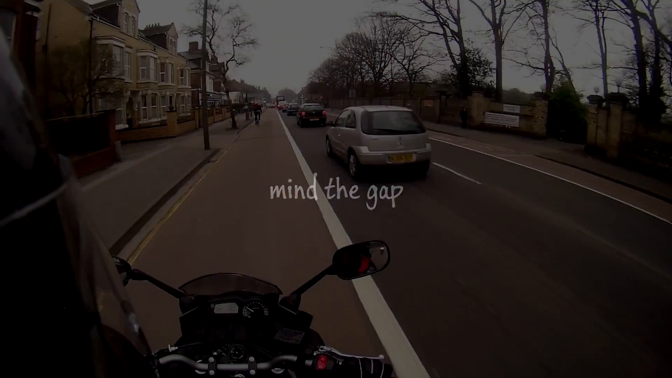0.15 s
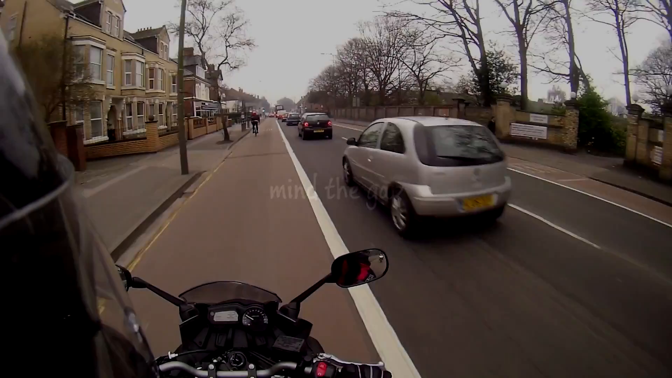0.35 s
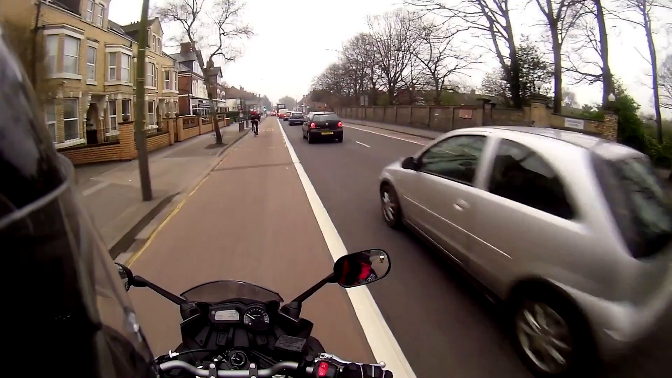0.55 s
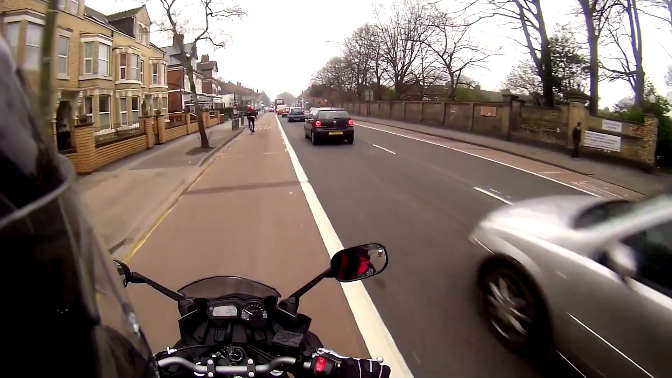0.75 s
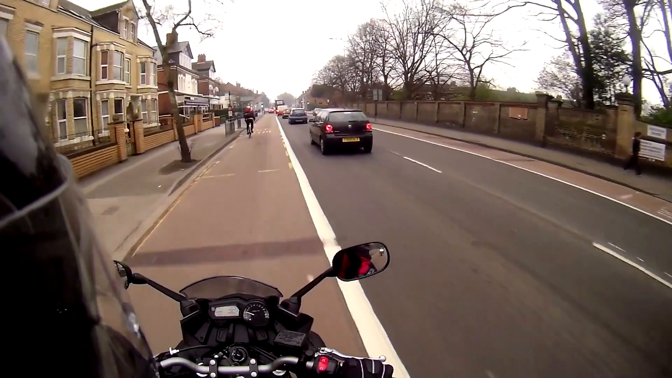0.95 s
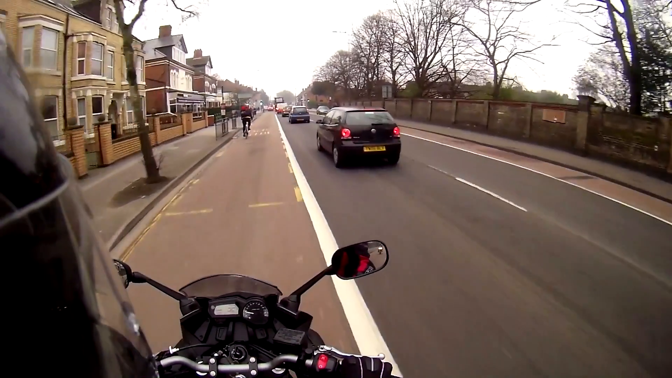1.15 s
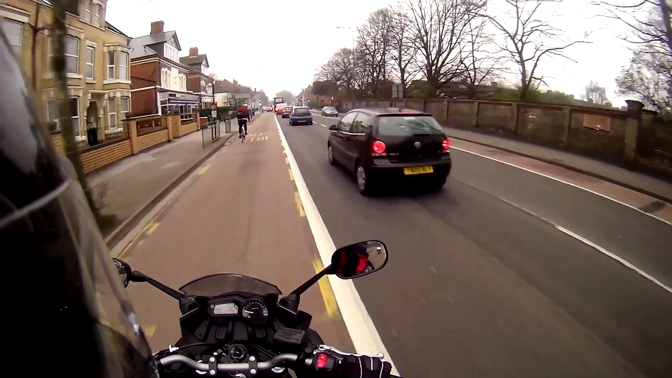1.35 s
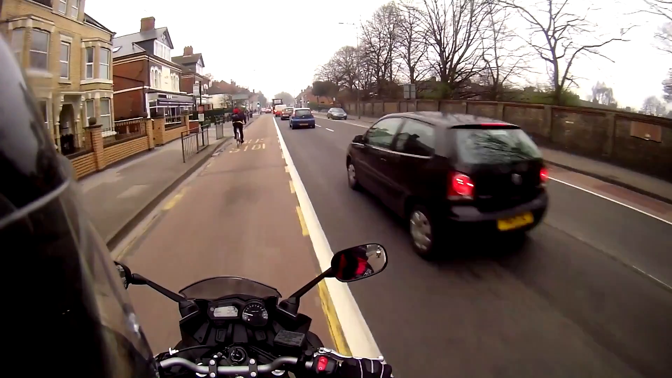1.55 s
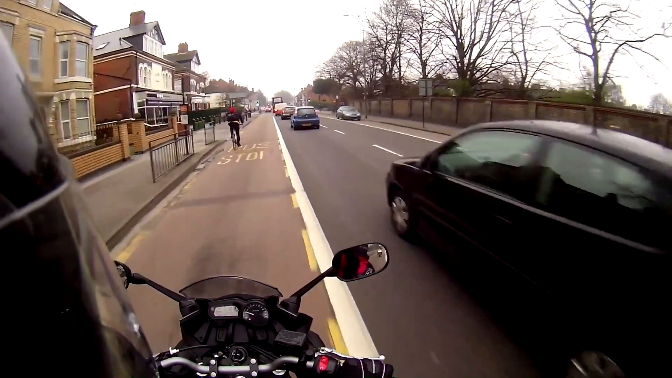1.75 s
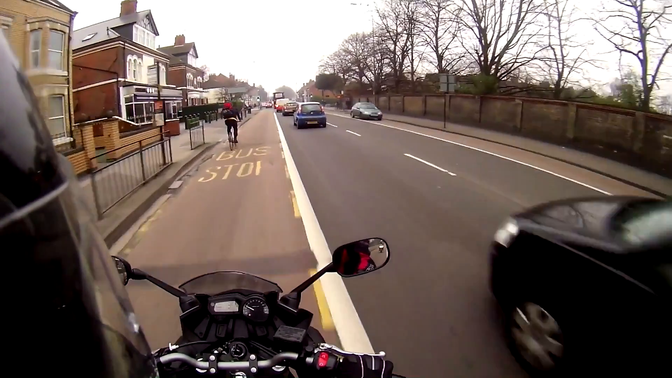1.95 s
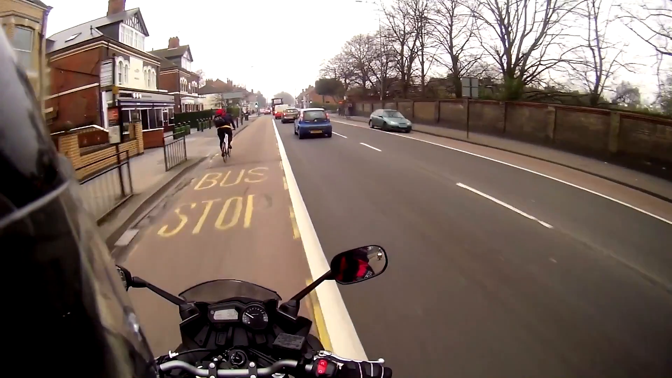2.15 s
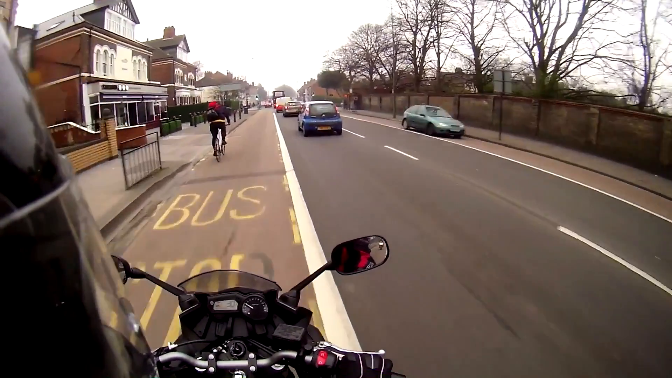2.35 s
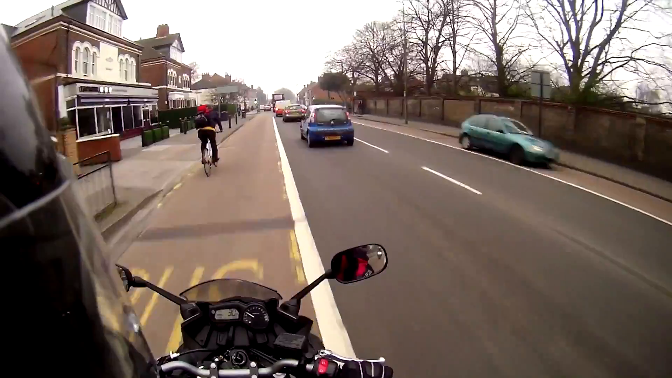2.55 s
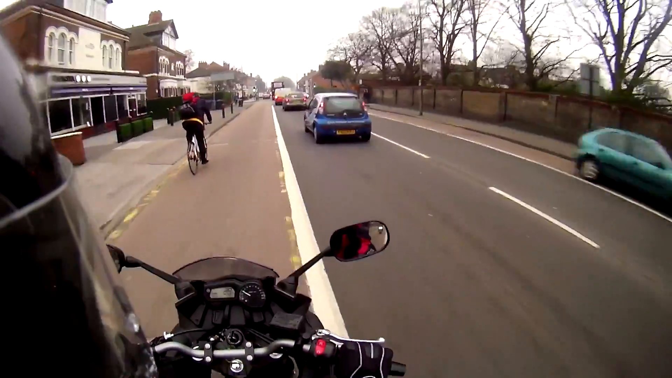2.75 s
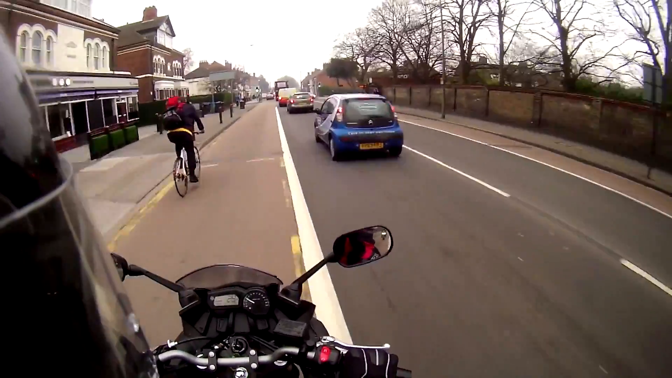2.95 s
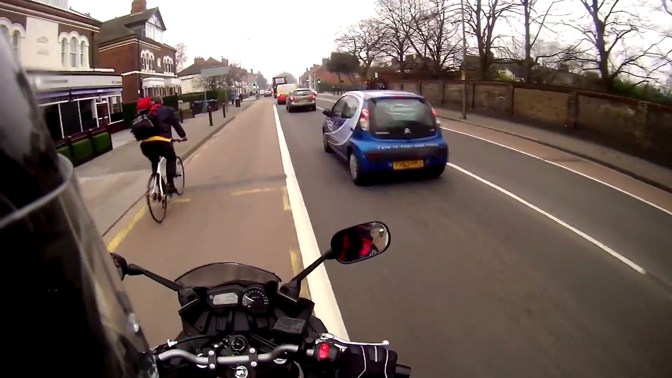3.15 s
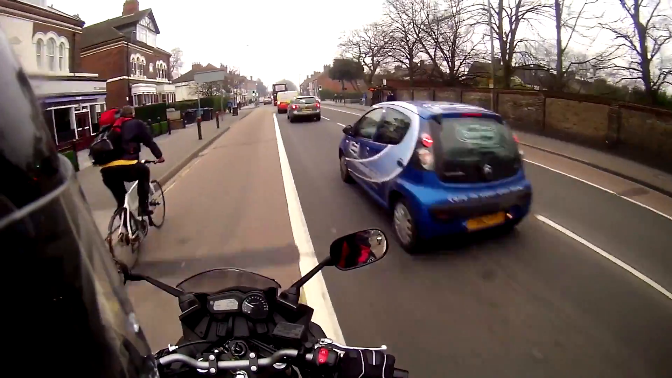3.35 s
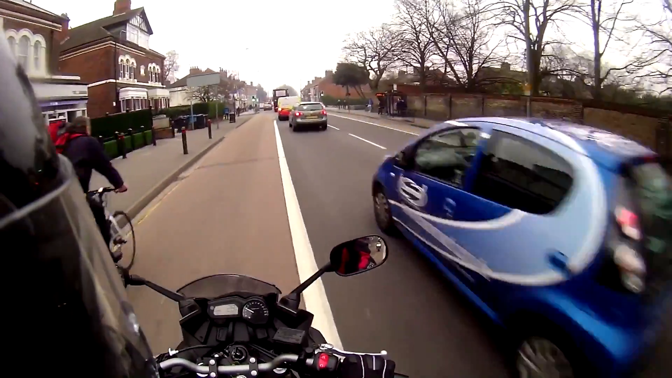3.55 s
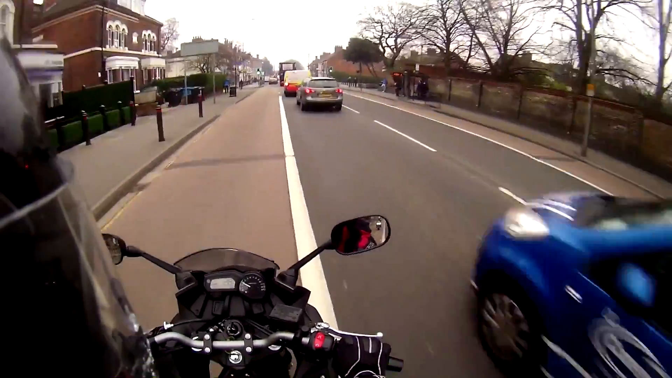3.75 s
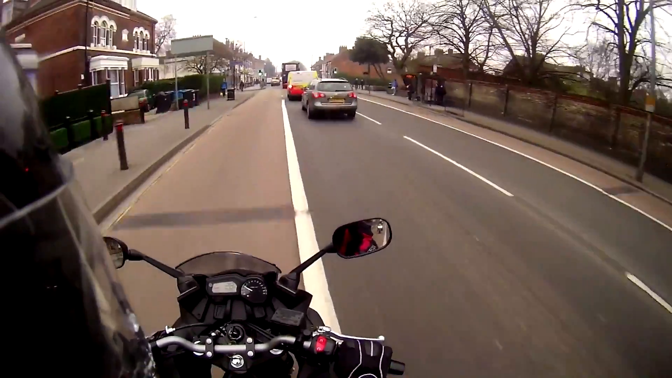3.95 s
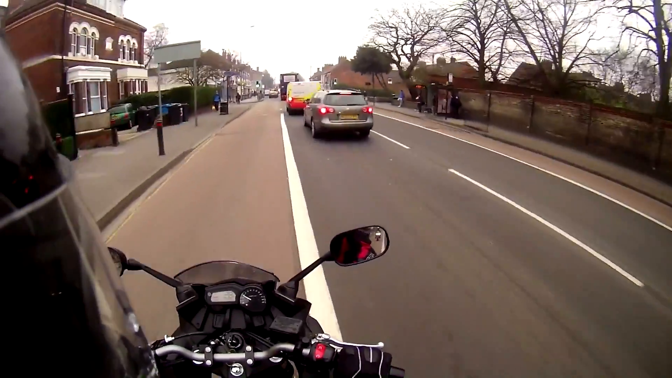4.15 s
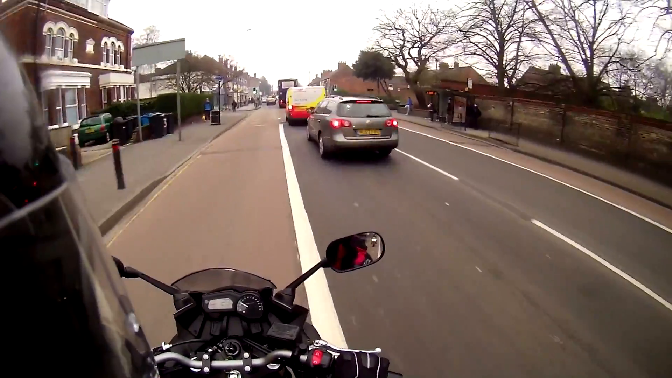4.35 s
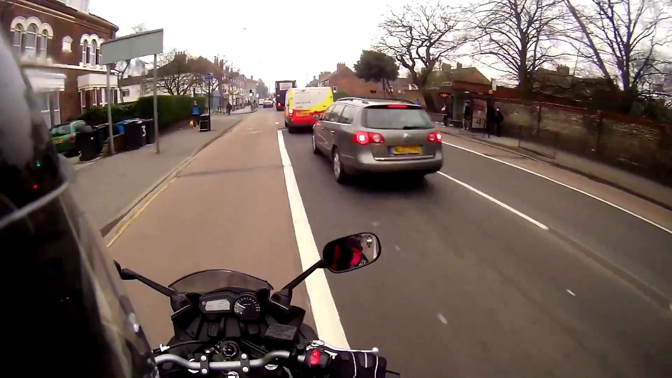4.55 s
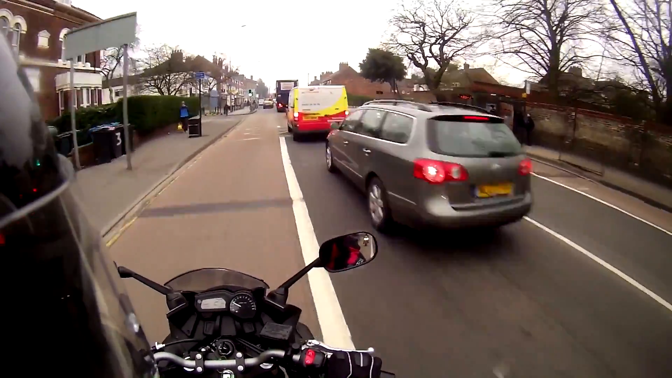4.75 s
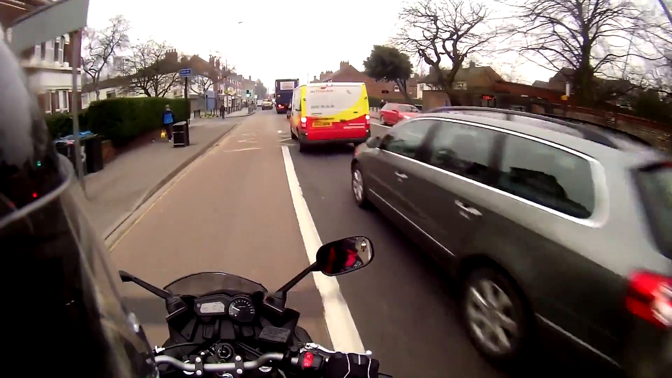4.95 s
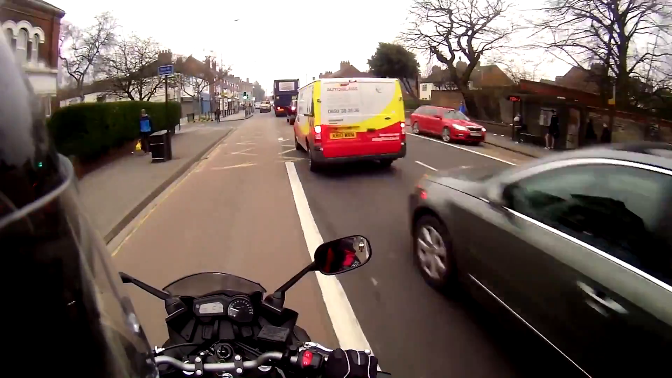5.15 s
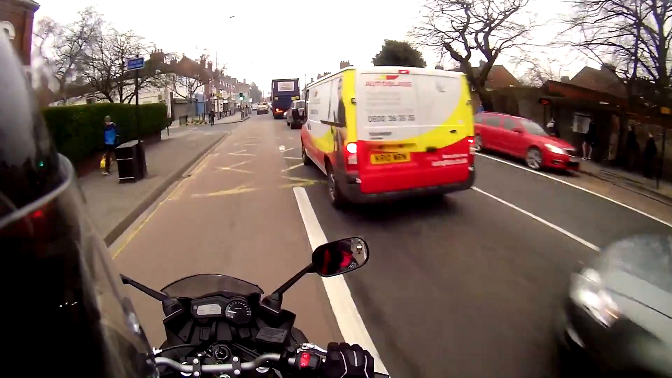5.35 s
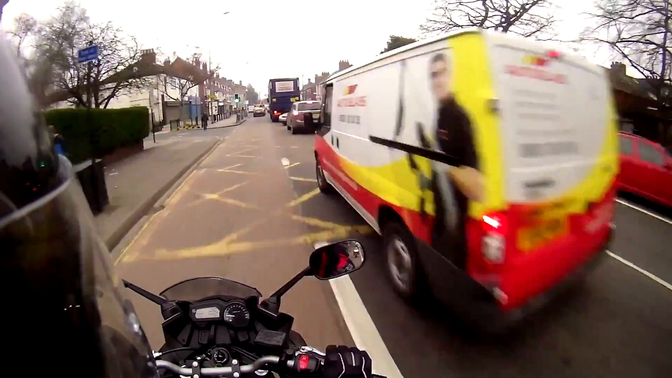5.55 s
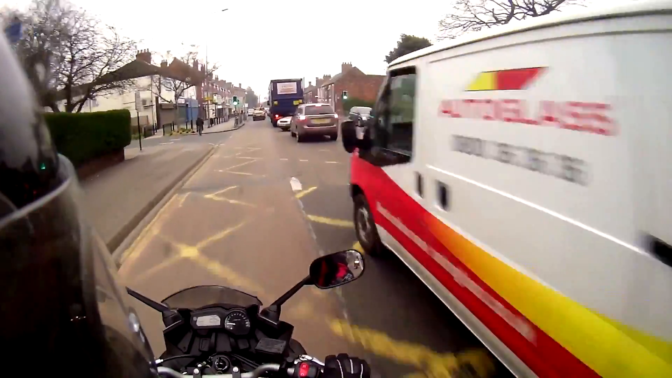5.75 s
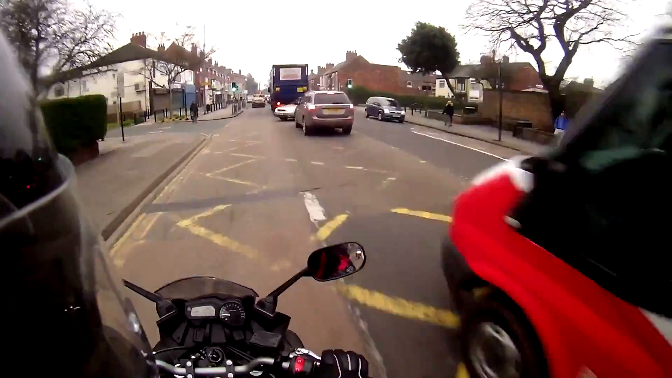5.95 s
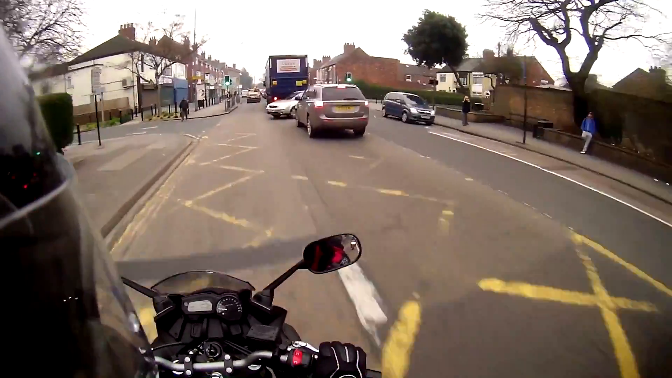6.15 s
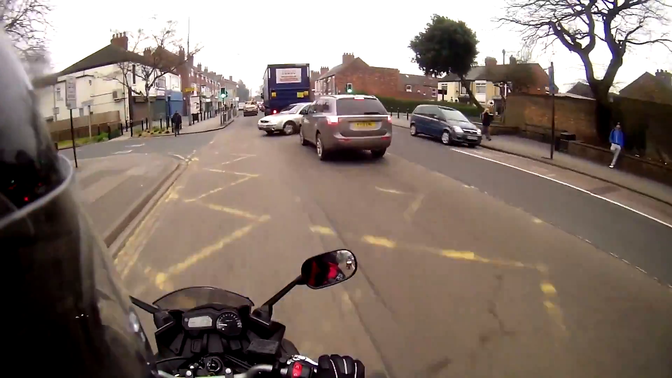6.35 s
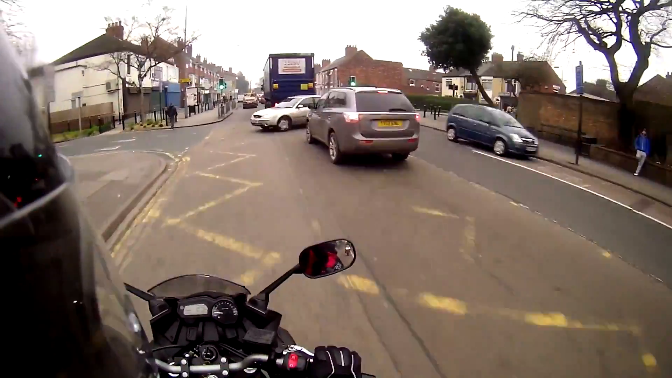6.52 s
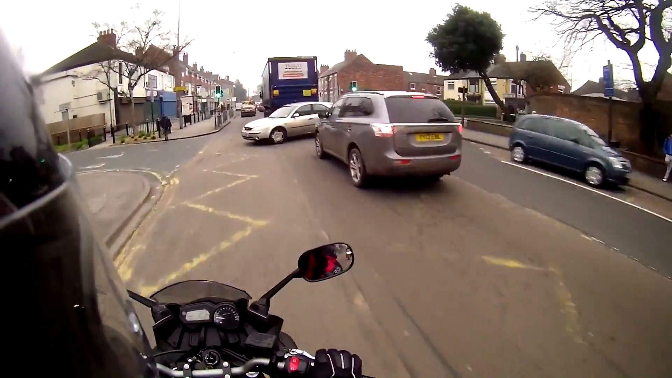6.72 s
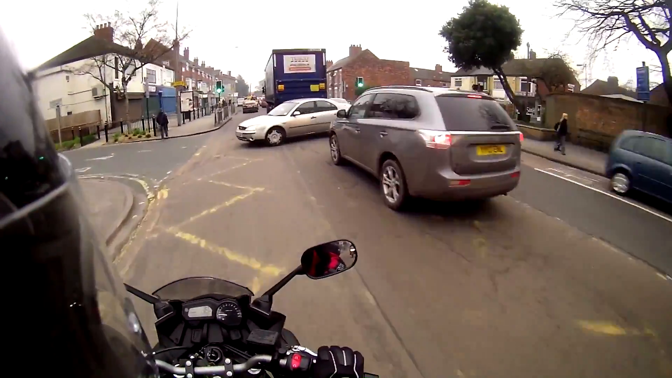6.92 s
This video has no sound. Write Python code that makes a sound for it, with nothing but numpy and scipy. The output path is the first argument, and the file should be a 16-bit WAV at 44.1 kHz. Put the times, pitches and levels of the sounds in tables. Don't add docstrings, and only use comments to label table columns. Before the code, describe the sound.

Helmet microphone on a moving motorcycle in a city street. Heavy low wind buffets and flutters over a steady engine drone and tyre hiss. A short gritty scuff and tiny squeak come early, then a faint car whine. The engine slowly sinks in pitch, growing a howl, until the clutch cuts in with a quick downward slide. Hiss swells beside a van, then the wind eases.

```python
import sys
import numpy as np
from scipy import signal
from scipy.io import wavfile
from scipy.ndimage import uniform_filter1d

SR = 44100
rng = np.random.default_rng(int(sys.argv[2]) if len(sys.argv) > 2 else 0)


def master_out(mix):
    frames = np.transpose(np.atleast_2d(mix))
    ceiling = np.clip(frames, -1, 1)
    pcm = np.round(ceiling * 32767).astype(np.int16)
    wavfile.write(sys.argv[1], SR, pcm)


def volts_from_db(level):
    exponent = np.asarray(level, float) / 20
    return 10 ** exponent


N = 312228
T = np.arange(N) / SR

# (time [s], turns per second [Hz])
CRANK_SPEED = [(0, 46.5), (.5, 46.2), (1, 48.5), (1.9, 48.2), (2.8, 46), (3.75, 44.3), (3.98, 43.4),
               (4.1, 43.9), (4.45, 43.2), (4.6, 43), (4.85, 42.9), (4.91, 42), (4.96, 45), (5.5, 41.5),
               (5.75, 45.3), (6.05, 45.9), (7.08, 44.9)]
LEAD_ORDERS = (2, 3, 10, 12)
# (multiple of crank speed [1], level against the lead [dB])
MINOR_ORDERS = [
    [(4, -10), (6, -15)],
    [(5, -14), (6, -13), (1, -9), (4, -15)],
    [(8, -11), (11, -4)],
    [(14, -17)],
]
# (time [s], level [dB])
INTAKE_HOWL = [(0, -60), (2.0, -57), (2.9, -54), (3.2, -50), (3.9, -48), (3.97, -40), (4.5, -39),
               (7.08, -39)]
# (time [s], level [dB], length [s])
THROTTLE_BLIP = [
    (.2, 11, .8),
]
# (frequency [Hz], width [Hz], level [dB])
AIRBOX = (510, 41.5, -45)
# (time [s], level [dB])
ENGINE_SHAKE = [(0, -9), (.6, -3.5), (1.4, -4.5), (1.8, 3.5), (2.3, -1), (2.6, -0.5), (2.9, 2.5), (3.3, -2),
                (4.0, 2.5), (4.85, -2), (4.95, -6.5), (6, -19), (7.08, -7)]
# (time [s], frequency [Hz], level [dB])
CLUTCH_DIVE = [(4.87, 495, -48), (4.99, 396, -45), (5.07, 360, -52), (5.15, 330, -47), (5.3, 275, -52)]

# (time [s], roar level [dB])
AIRSTREAM = [(0.0, -40), (0.2, -36.5), (0.61, -32.5), (1.03, -32.5), (1.62, -37), (2.42, -34), (3.96, -36),
             (4.32, -38.5), (4.77, -36), (4.99, -37.5), (6.33, -39.5), (6.62, -42.5), (7.08, -45.5)]
# (time [s], level [dB], length [s])
GUSTS = [(0.07, 7.5, 0.074), (0.3, 6.5, 0.047), (0.51, -4, 0.2), (1.02, -8, 0.06), (1.1, -4.5, 0.053),
         (1.24, -4, 0.053), (1.47, -4.5, 0.055), (1.68, 8.5, 0.23), (1.93, -7, 0.076), (2.11, -3.5, 0.054),
         (2.3, 6, 0.097), (2.42, -2, 0.053), (2.79, 7.5, 0.065), (2.86, -3.0, 0.052), (3.18, -9, 0.13),
         (3.62, 7, 0.053), (4.14, 5, 0.1), (4.26, 3.5, 0.91), (4.46, -4, 0.072), (4.55, 10.5, 0.06),
         (4.89, -7, 0.14), (5.04, 7, 0.068), (5.33, 5, 0.3), (5.57, 2.9, 0.06), (5.7, -3.5, 0.15),
         (5.96, -3, 0.45), (6.0, -5.7, 0.06), (6.54, -3, 0.09), (6.71, -5, 0.046), (6.95, -2, 0.13)]
# (time [s], level [dB], length [s])
FLAPS = [(0.02, 0.7, 0.8), (0.34, 3.5, 0.056), (0.96, -0.5, 0.26), (1.25, 0.5, 0.065), (1.35, 3.5, 0.09),
         (1.55, 3.5, 0.054), (1.79, 3, 0.3), (2.1, -2.5, 0.15), (2.39, 2.5, 0.059), (2.51, -2.5, 0.06),
         (2.57, 3, 0.06), (2.66, -3.5, 0.11), (2.98, -7, 0.09), (3.09, 3, 0.12), (3.85, 4.5, 0.1),
         (4.33, 2, 0.049), (4.41, -3.5, 0.075), (4.66, 4.7, 0.081), (4.8, 5, 0.078), (4.94, 5.0, 0.07),
         (5.13, -0.5, 0.08), (5.25, 5.5, 0.042), (5.34, -7, 0.054), (5.55, -1, 0.34), (5.94, 2.3, 0.09),
         (6.35, -1, 0.66), (6.37, -11, 0.06), (6.79, -11, 0.1), (6.97, 4, 0.19), (6.99, -7, 0.075)]
# (frequency [Hz], level [dB per Hz])
BUFFET_SPECTRUM = [(4.7, -32.5), (8.0, 0), (27, 10.5), (60, -9), (78, -24.5), (130, -120)]
# (frequency [Hz], level [dB per Hz])
FLUTTER_SPECTRUM = [(29, -44.5), (50, 1.5), (94, -9), (220, -23.5), (290, -43.5), (480, -120)]
# (frequency [Hz], level [dB per Hz])
ROAR_SPECTRUM = [(59, -9), (100, 1), (145, -6), (184, -10.5), (270, -9), (324, -11.5), (382, -9),
                 (500, -14), (800, -35), (1040, -63), (1760, -120)]

# (time [s], level [dB])
ROAD_NEARNESS = [(0, -6.5), (.12, -2), (.4, 1), (1.0, -2), (1.5, 0), (2.5, 2), (3.3, .5), (4.2, -.5),
                 (4.9, -0.5), (5.2, -2), (6.2, -4), (6.7, -5), (7.08, -6)]
# (time [s], level [dB], length [s])
PASSES = [(.68, 3, 0.45), (1.0, 2, 0.21), (1.9, 2, 0.4), (3.75, 1.7, 0.12), (4.9, 0, 0.15), (5.97, 0, 0.23)]
# (start [s], end [s], level [dB])
VAN_SIDE = (5.6, 6.14, 3.5)
# (frequency [Hz], level [dB per Hz])
TYRE_SPECTRUM = [(330, -33.5), (560, 0.5), (832, -10), (1150, -7), (1500, -18), (1950, -53.5), (3300, -120)]
# (frequency [Hz], level [dB per Hz])
TREAD_SPECTRUM = [(850, -24), (1450, -2.5), (1720, -2.5), (2010, -3.5), (2160, -4), (2320, -4.5),
                  (2910, -12.5), (3500, -16.5), (4550, -31.5), (7700, -120)]
# (frequency [Hz], width [Hz], level against tread noise [dB])
FAIRING_PANELS = [
    (2021, 83, -10),
    (2343, 170, -11.5),
    (5510, 65, -31),
]
# (frequency [Hz], level [dB per Hz])
HISS_SPECTRUM = [(1650, -12.5), (2800, -3.5), (4520, -8.5), (5620, -9), (6480, -13.5), (7920, -11),
                 (10300, -17), (11500, -25.5), (15000, -59.5), (22000, -120)]

# (time [s], level [dB], length [s], colour [Hz], width [Hz])
SCUFFS = [(.562, -67, .005, 8050, 250), (.576, -65, .007, 8050, 250), (.648, -48, .016, 2000, 1500),
          (.652, -56, .012, 5200, 1400), (.653, -54, .016, 3300, 5000), (.657, -65, .02, 8500, 2000),
          (.66, -61, .06, 3500, 4000), (.915, -62, .018, 4500, 4000), (1.884, -66, .006, 5900, 600),
          (5.063, -67, .005, 5850, 400), (5.657, -70, .035, 7000, 4000)]
# (time [s], frequency [Hz], level [dB])
BRAKE_SQUEAK = [(.916, 6230, -72), (.926, 6230, -76), (.933, 6240, -65), (.94, 6240, -71),
                (.947, 6230, -66), (.96, 6140, -70), (.99, 6200, -73), (1.01, 6180, -77)]
# (time [s], frequency [Hz], level [dB])
CAR_WHINE = [(1.0, 627, -53), (1.3, 616, -48), (1.7, 600, -47), (2.1, 587, -48), (2.5, 576, -52)]
# (time [s], frequency [Hz], level [dB])
TYRE_SONG = [(1.7, 682, -55), (2.0, 672, -52), (2.35, 660, -51), (2.65, 652, -55)]
# (time [s], frequency [Hz], level [dB])
FAR_BRAKE = [(5.74, 4110, -79), (5.85, 4220, -83), (5.97, 4220, -80), (6.01, 4180, -75), (6.05, 4150, -79)]
# (time [s], frequency [Hz], level [dB])
BUS_DRONE = [(6.2, 387, -57), (6.7, 384, -55), (6.9, 381, -51), (7.08, 378, -53)]


def evened(x):
    return x / np.sqrt(np.mean(x ** 2) + 1e-20)


def columns(rows, t):
    s, *rest = np.transpose(rows)
    return [np.interp(t, s, c) for c in rest]


def level_curve(rows):
    return columns(rows, T)[0]


def bumps(rows):
    t = T[::64]
    total_db = sum(db * np.exp(-(2 * (t - s) / length) ** 2) for s, db, length in rows)
    return np.interp(T, t, total_db)


def drift(rate_hz, length=N):
    knots = rng.standard_normal(int(length / SR * 60) + 9)
    smooth = signal.lfilter([1], [1, -np.exp(-2 * np.pi * rate_hz / 60)], knots)
    return evened(np.interp(np.arange(length) / SR * 60, np.arange(len(knots)), smooth))


def resonate(x, hz, width):
    turn = np.exp(2j * np.pi * hz * np.arange(len(x)) / SR)
    r = np.exp(-np.pi * width / SR)
    smooth = signal.lfilter([1], np.convolve([1, -r], [1, -r]), x / turn)
    return (turn * smooth).real


def noise(spectrum, size, patchy_db, flicker_db):
    frames, hz = 4 * N // size + 5, np.fft.rfftfreq(size, 1 / SR)
    a, b, patches = rng.standard_normal((frames, len(hz), 3)).T
    patches = uniform_filter1d(patches, size=size // 100, axis=0)
    patches = evened(uniform_filter1d(patches, size=16000 // size, axis=1))
    flicker = evened(uniform_filter1d(rng.standard_normal(frames), size=8000 // size + 1))
    f, db = np.transpose(spectrum)
    shape_db = np.interp(np.log(hz + 1), np.log(f + 1), db, left=-120, right=-120)[:, None]
    z = (a + 1j * b) * volts_from_db(shape_db + patchy_db * patches + flicker_db * flicker)
    return evened(signal.istft(z, nperseg=size, noverlap=3 * size // 4)[1][:N])


def steadied(x, span_s):
    size = int(span_s * SR)
    power = uniform_filter1d(uniform_filter1d(x ** 2, size), size)
    return evened(x / np.sqrt(power + 0.071))


def order_levels():
    clutch_s, clutch_length_s = 4.89, .06
    free = np.clip((T - clutch_s) / clutch_length_s + .5, 0, 1)
    howl_db = level_curve(INTAKE_HOWL)
    low_howl_db = np.minimum(howl_db + 2 + bumps(THROTTLE_BLIP), -46)
    pulling_db = [-35.5, -56, low_howl_db, howl_db]
    coasting_db = [-44, -40, -63, -63]
    return [a + (b - a) * free for a, b in zip(pulling_db, coasting_db)]


def engine():
    turns = np.cumsum(level_curve(CRANK_SPEED) * (1 + .005 * drift(6.0))) / SR
    out = np.zeros(N)
    for lead, level_db, minor in zip(LEAD_ORDERS, order_levels(), MINOR_ORDERS):
        for order, db in [(lead, 0)] + list(minor):
            wavering = volts_from_db(level_db + db + 1.8 * drift(8.0))
            out += wavering * np.sqrt(2) * np.sin(2 * np.pi * (order * turns + rng.random()))
    hz, width, db = AIRBOX
    breath = evened(resonate(rng.standard_normal(N), hz, width))
    out += volts_from_db(db + level_curve(ENGINE_SHAKE)) * breath
    beat = np.cos(np.pi * turns) + 0.74 * np.cos(2 * np.pi * turns)
    return out, beat


def wind_on_microphone():
    air_db = level_curve(AIRSTREAM) + 35.7
    lumps_db = 2.6 * drift(10.0)
    buffet_db = -25.03 + 1.43 * air_db + 1.1 * bumps(GUSTS) + lumps_db
    flutter_db = -29.0 + 1.21 * air_db + 1.43 * bumps(FLAPS)
    buffet = steadied(noise(BUFFET_SPECTRUM, size=8192, patchy_db=-1.6, flicker_db=-0.5), 0.1)
    flutter = steadied(noise(FLUTTER_SPECTRUM, size=8192, patchy_db=1.4, flicker_db=0), 0.065)
    return volts_from_db(buffet_db) * buffet + volts_from_db(flutter_db) * flutter


def helmet_roar(beat):
    roar = steadied(noise(ROAR_SPECTRUM, size=4096, patchy_db=0.97, flicker_db=0), 0.077)
    return volts_from_db(level_curve(AIRSTREAM) + 1.5 + 0.19 * beat) * roar


def tyre_rumble(beat):
    air_db = level_curve(AIRSTREAM) + 35.7
    level_db = -45.5 + 0.52 * level_curve(ROAD_NEARNESS) + 0.4 * air_db + 1.07 * bumps(PASSES)
    rumble = steadied(noise(TYRE_SPECTRUM, size=1024, patchy_db=0.5, flicker_db=0.5), .2)
    return volts_from_db(level_db + .5 * beat) * rumble


def tread_and_fairing(beat):
    level_db = -54.76 + 1.18 * level_curve(ROAD_NEARNESS) + .6 * bumps(PASSES)
    panels = np.zeros(N)
    for hz, width, db in FAIRING_PANELS:
        panels += volts_from_db(db) * evened(resonate(rng.standard_normal(N), hz, width))
    tread = noise(TREAD_SPECTRUM, size=1024, patchy_db=0.94, flicker_db=0.52)
    return volts_from_db(level_db + 0.24 * beat) * (tread + volts_from_db(level_curve(ENGINE_SHAKE)) * panels)


def road_hiss(beat):
    start, end, van_db = VAN_SIDE
    returned_db = np.interp(T, [start, end - .25, end, end + .06], [0, van_db, van_db, 0])
    level_db = -64.0 + 1.1 * level_curve(ROAD_NEARNESS) + 1.1 * bumps(PASSES) + returned_db
    hiss = noise(HISS_SPECTRUM, size=512, patchy_db=0.83, flicker_db=0.6)
    return volts_from_db(level_db + 0.37 * beat) * hiss


def scuffs():
    out = np.zeros(N)
    t = (np.arange(4000) - 2000) / SR
    for s, db, length, hz, width in SCUFFS:
        at = round(s * SR) - 2000
        puff = evened(resonate(rng.standard_normal(4000), hz, width))
        out[at:at + 4000] += volts_from_db(db) * puff * np.exp(-(2 * t / length) ** 2)
    return out


def passing_tone(rows, waver, waver_hz, fade):
    on = (T >= rows[0][0]) & (T < rows[-1][0])
    hz, db = columns(rows, T[on])
    unsteady = 1 + waver * drift(waver_hz, len(hz))
    tone = np.sqrt(2) * np.sin(2 * np.pi * np.cumsum(hz) / SR)
    out = np.zeros(N)
    out[on] = volts_from_db(db) * unsteady * tone * signal.windows.tukey(len(hz), fade)
    return out


def overtaken_traffic():
    out = passing_tone(BRAKE_SQUEAK, .15, 25.0, .1)
    out += passing_tone(CAR_WHINE, .3, 5.6, .2)
    out += passing_tone(TYRE_SONG, .3, 6.0, .2)
    out += passing_tone(FAR_BRAKE, .3, 14.0, .2)
    out += passing_tone(BUS_DRONE, .25, 6.0, .14)
    return out


def scene():
    drone, beat = engine()
    air = wind_on_microphone() + helmet_roar(beat)
    road = tyre_rumble(beat) + tread_and_fairing(beat) + road_hiss(beat)
    clutch_dive = passing_tone(CLUTCH_DIVE, .15, 11.0, 0.18)
    return (drone + air + road + scuffs() + overtaken_traffic() + clutch_dive)[None]


def starved(x, edge_hz, share):
    hz, t, z = signal.stft(x, SR, nperseg=1024, noverlap=768)
    patches = rng.standard_normal(z.shape[:0:-1]).T
    patches = evened(uniform_filter1d(uniform_filter1d(patches, size=3, axis=0), size=9, axis=1))
    holes = (patches > np.quantile(patches, 1 - share)) & (hz[:, None] > edge_hz)
    return signal.istft(z * np.where(holes, .05, 1), SR, nperseg=1024, noverlap=768)[1][:, :N]


def top_cut(x):
    return signal.sosfilt(signal.butter(12, 14290, fs=SR, output="sos"), x)


def record(dry):
    dulled = signal.lfilter(*signal.butter(4, 11500, fs=SR), dry)
    self_noise = np.sqrt(SR / 2 / 3000) * rng.standard_normal(dry.shape)
    filmed = starved(dulled + volts_from_db(-85) * self_noise, edge_hz=11900, share=.22)
    return top_cut(filmed)


dry = scene()
out = record(dry)
master_out(out)
```